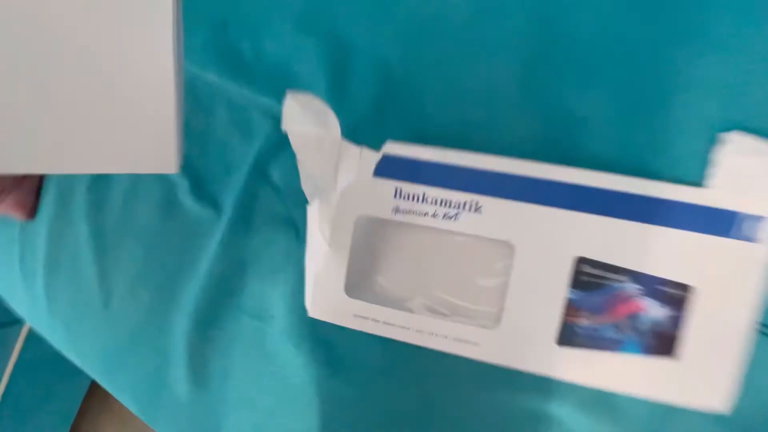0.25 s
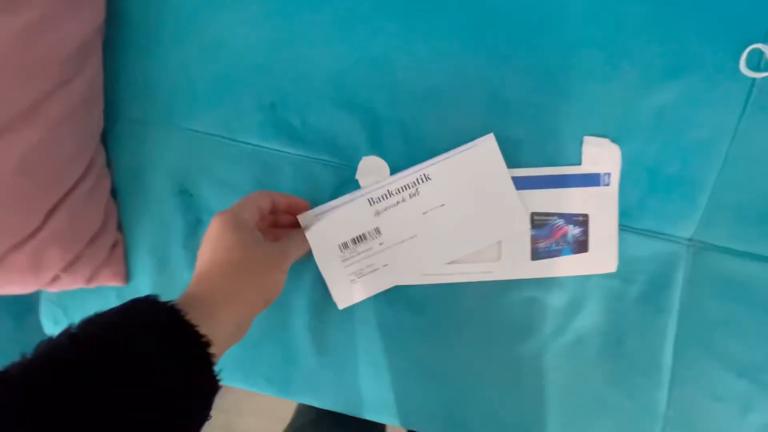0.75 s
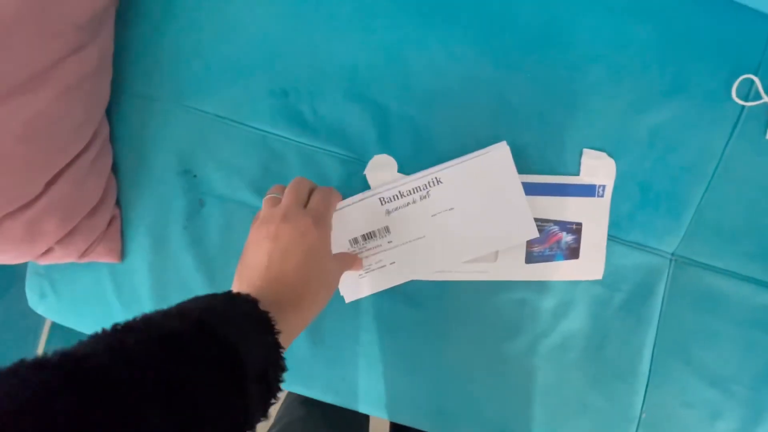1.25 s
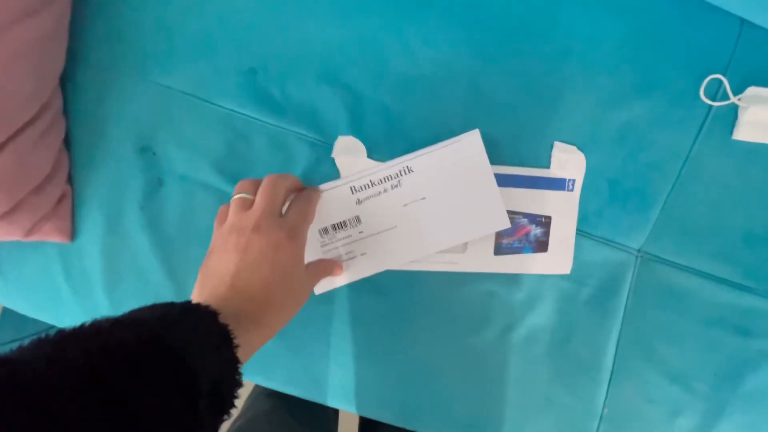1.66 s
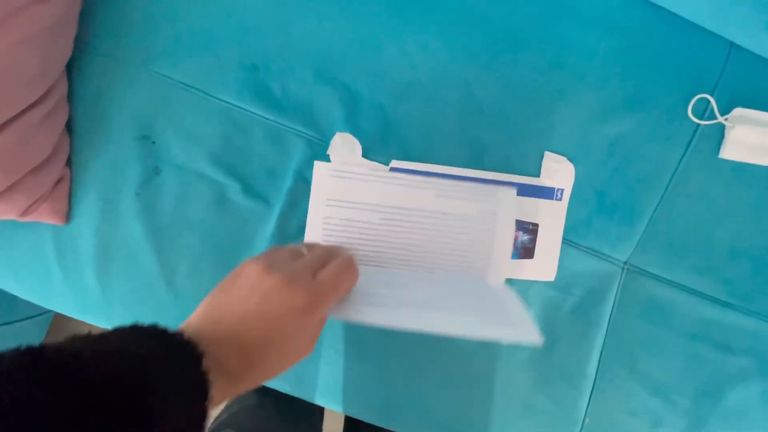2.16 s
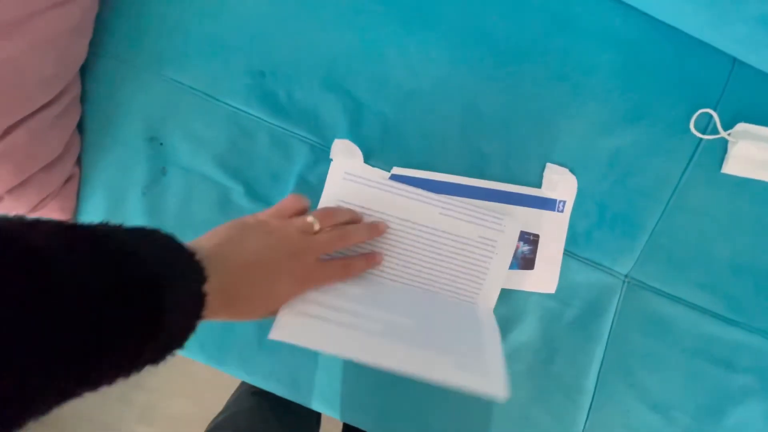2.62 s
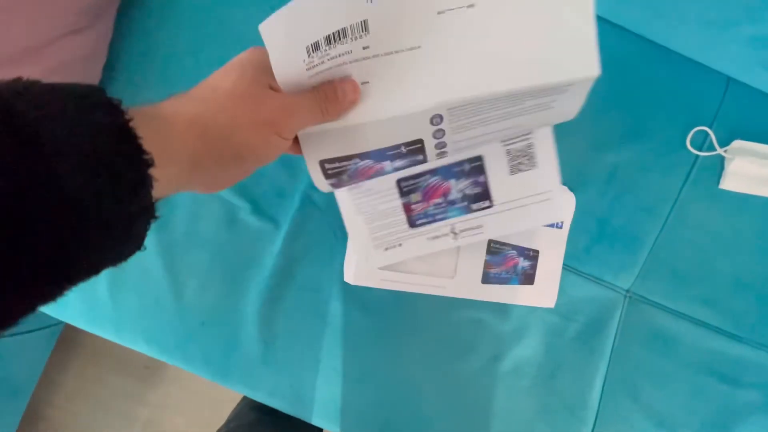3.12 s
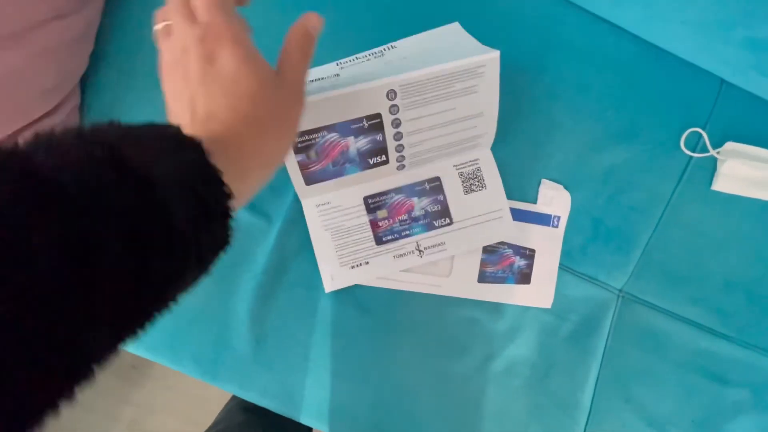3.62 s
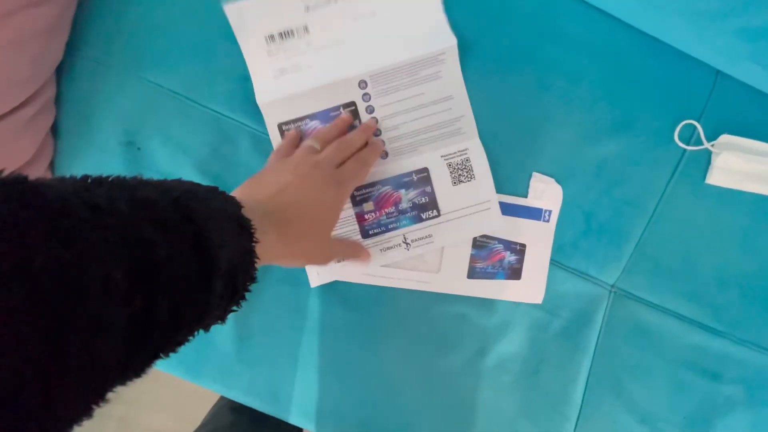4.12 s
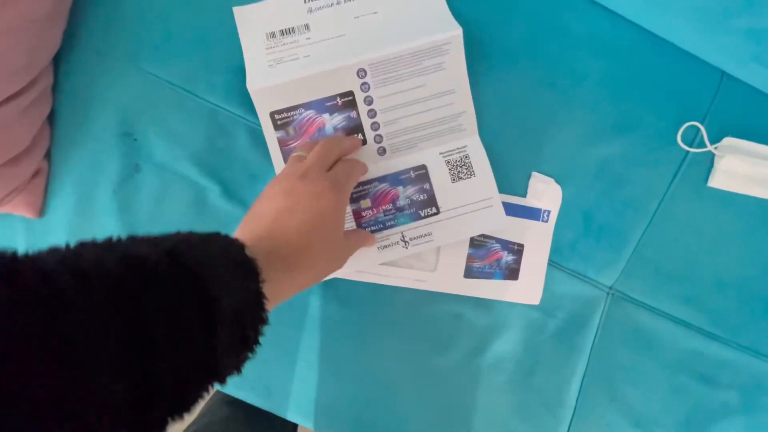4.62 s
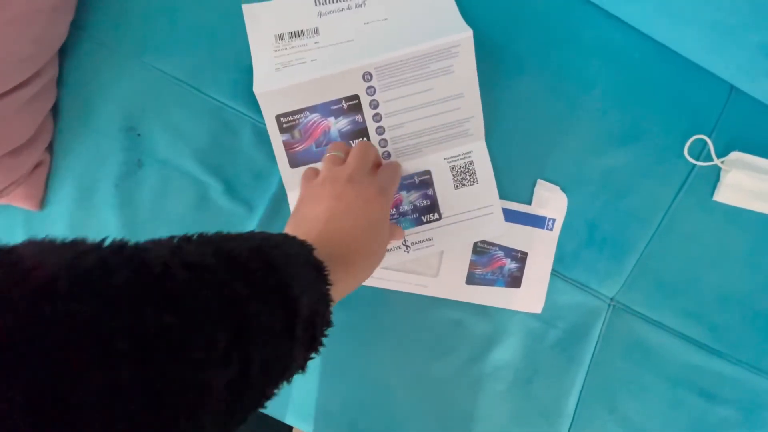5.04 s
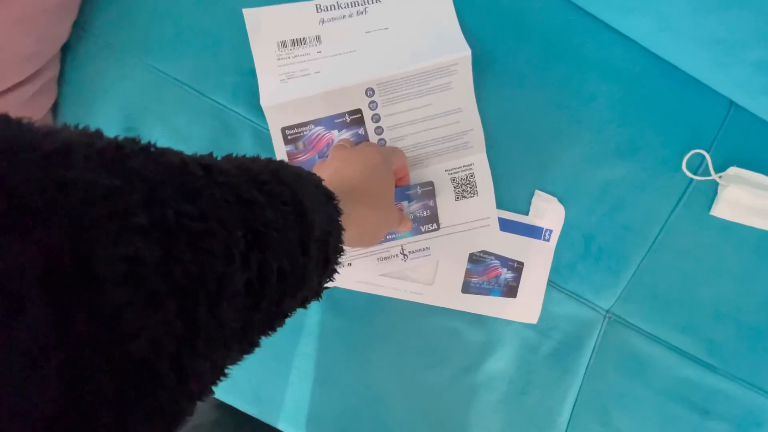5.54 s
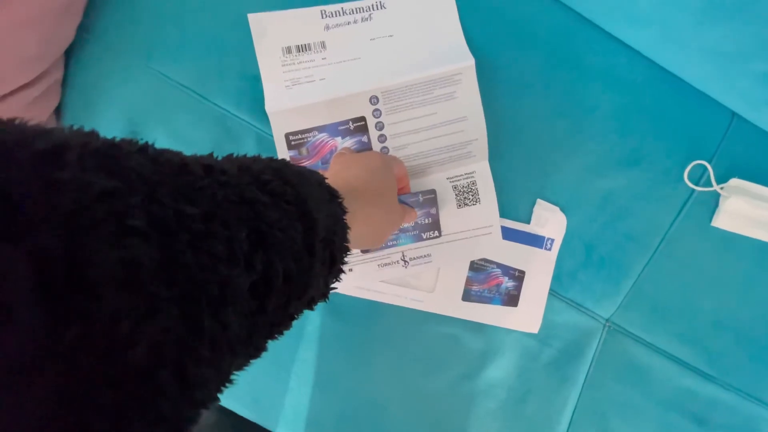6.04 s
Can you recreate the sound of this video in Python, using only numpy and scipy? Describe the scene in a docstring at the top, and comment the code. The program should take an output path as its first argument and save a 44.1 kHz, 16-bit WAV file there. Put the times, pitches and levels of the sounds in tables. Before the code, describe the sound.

Very close, a paper sheet brushes and hisses over an envelope on a cushioned sofa. It slides, buckles and unfolds with a loud crease pop, then crackles as it is flattened. Quiet fingertip rubbing follows, before glue lets go in sharp bright snaps. Soft low thuds accompany handling; a small stereo device hears it in a dry furnished room over faint rumble.

```python
"""Unfolding a letter on a sofa

A hand lays a folded letter on its envelope on a sofa, slides it, unfolds it and peels at a glued card.
Rubbing is random fibre grains coloured into hiss, finest fibres and sheet body, swelling stroke by stroke.
Creases, glue, taps and ticks are noise bursts spread by pitch; sheet and cushion thud in low noise.
Two microphone ports a few centimetres apart listen in a soft furnished room, over a faint house rumble."""
import sys
import numpy as np
from scipy import signal
from scipy.fft import rfft, irfft, next_fast_len
from scipy.io import wavfile

SR = 44100
rng = np.random.default_rng(int(sys.argv[2]) if len(sys.argv) > 2 else 0)


def transcribe(u):
    """Save the signal u as a 16-bit wav file named by the first command-line argument.

    u: samples, shape (n,) or (channels, n), limited to [-1, 1]; the rate is SR.
    q: integer samples, one column per channel.
    """
    v = np.clip(np.atleast_2d(u).T, -1, 1)
    q = np.round(v * 32767).astype(np.int16)
    wavfile.write(sys.argv[1], SR, q)


N = 276948

# Spectrum shapes of paper hiss, finest fibres, sheet body, moving air and house rumble; only the shape counts.
# Each row: frequency in Hz, relative density in dB per Hz.
HISS_SPECTRUM = [(1800, -24), (2800, 1.5), (3800, 4.5), (5200, 6.5), (9000, 10.5), (10500, -39.5)]
FINE_SPECTRUM = [(8800, -37), (10900, -11.5), (12000, -34)]
BODY_SPECTRUM = [(200, -15.5), (850, 1), (1500, -3.5), (2400, 2.5), (3300, -13)]
THUD_SPECTRUM = [(30, -14), (60, 5), (120, 3.5), (280, -1.5), (800, -47)]
RUMBLE_SPECTRUM = [(25, -17), (58, -2.5), (85, -8.5), (500, -39), (11000, -49), (13000, -81)]
RUMBLE_DB = -65   # rms of the part both ports share

# Phase lead of the left port over the right. Each row: frequency in Hz, lead in radians.
LEFT_LEADS = [(500, .1), (1700, -.55), (2500, -1.2), (4400, -1.7), (5300, .35), (7700, 2.5), (9600, 3.2),
              (12200, 5.8)]
# Level of the left port over the right. Each row: frequency in Hz, difference in dB.
LEFT_LOUDER = [(110, 0), (400, 3.5), (1400, 2), (3200, -3), (5000, -.5)]
# Gain of the rubbing that reaches the ports in opposite polarity. Each row: frequency in Hz, gain in dB.
OPPOSED_RUBBING = [(400, 4), (1200, -9.5), (4500, -4), (8000, -20.5)]
ROOM_T60_S, ROOM_DB = .25, -27
CUTOFF_HZ = 16600

# Fingers and sheets slide.
# Each row: start in seconds, length in seconds, hiss level in dB, finest-fibre share in dB.
SLIDES = [(0.0, 0.095, -48.5, -1), (0.151, 0.085, -61, 5.5), (0.25, 0.096, -52.5, -3.5),
          (0.356, 0.22, -59.5, -2), (0.454, 0.075, -51, -5.5), (0.605, 0.079, -60.5, -2),
          (0.689, 0.15, -52.5, -8), (1.111, 0.069, -55, 3), (1.21, 0.14, -63.5, 2.5),
          (1.392, 0.079, -58.5, 4.5), (1.492, 0.26, -64, 8), (1.781, 0.13, -49, 3.5),
          (1.916, 0.29, -53.5, 2), (2.215, 0.13, -54.5, 5.5), (2.347, 0.33, -54.5, 5),
          (2.664, 0.26, -47.5, -0.5), (2.933, 0.28, -53.5, 1.5), (3.23, 0.16, -48, 1),
          (3.397, 0.058, -42.5, -6), (3.81, 0.077, -52, -5), (3.914, 0.028, -52.5, -3),
          (3.942, 0.22, -57, -1.5), (4.146, 0.18, -70.5, -4), (4.358, 0.56, -60, 1.5),
          (4.653, 0.22, -59.5, 1), (4.929, 0.29, -56, -1.5), (5.125, 0.03, -49, -2),
          (5.229, 0.1, -62.5, -3), (5.338, 0.21, -57, -1), (5.528, 0.12, -69, -7), (5.671, 0.19, -73.5, -6),
          (5.859, 0.46, -64.5, -28)]
SLIDE_RISE_S, SLIDE_STOP_S = .008, .05   # rise time, time to fall 60 dB
SLIDE_ARCH_DB = 3   # a slide is fastest in its middle, quieter by this at both ends
AFTER_DB, AFTER_T60_S = -10, .3   # the sheet settles after each slide, without the finest fibres
# How freely the sheet sounds along with a slide. Each row: time in seconds, body share in dB.
FREE_SHEET = [(0, -37), (.4, -15), (.75, -9.5), (2.3, -3), (3.33, -8.5), (3.42, -4), (3.8, 7.5), (4.09, 5),
              (4.64, -10.5), (4.72, 10), (4.8, -9), (5.0, 4.5), (5.85, 1), (6.28, -3.5)]
# The sheet buckles. Each row: start in seconds, hiss level in dB, body share in dB.
CRUMPLES = [(0.0, -26.5, -11.5), (0.672, -38.5, 3), (0.985, -41, -5.5), (1.058, -51, -4),
            (1.702, -46.5, -6), (1.739, -39, -8.5), (2.129, -41.5, -5.5), (2.241, -55, 16),
            (2.786, -39.5, 14), (2.86, -37.5, -5), (3.845, -32.5, -6.5), (3.995, -30.5, -4),
            (4.053, -40.5, 17), (4.959, -39, 3.5), (5.164, -45, 8), (5.395, -61, 16), (5.474, -42.5, 5.5),
            (6.041, -46.5, 0)]
CRUMPLE_RISE_S, CRUMPLE_T60_S, CRUMPLE_FINE_DB = 0.007, .14, -4.5
GRAINS_PER_S, CRINKLES_PER_S = 20000, 6000   # average counts
RUB_TOP_HZ = 12300   # rubbing falls off steeply above this

# Hand and sheet press the cushion or flap. Each row: start in seconds, peak in dB, centre in Hz.
THUMPS = [(0.0, -35, 85.6), (0.198, -41.5, 79), (0.246, -37.5, 59), (0.688, -37.5, 138),
          (1.047, -46.5, 112), (2.255, -44, 70), (2.791, -36, 267), (3.417, -43.5, 148), (3.82, -40.5, 213),
          (3.977, -38, 209), (4.118, -38, 145), (5.037, -40.5, 147), (5.999, -35.5, 140),
          (6.14, -45.5, 142)]
THUMP_RISE_S, THUMP_T60_S = 0.004, 0.42
PUSH = 1.6   # weight of the first push of a thump against the lumpy noise after it

# Creases flip over. Each row: start in seconds, peak in dB, bass share in dB (full two octaves below 2500 Hz),
# treble share in dB per octave above 3000 Hz, length in seconds (60 dB fall at 2500 Hz).
CREASES = [(0.671, -28, -10, 0, 0.021), (0.953, -35, 9.5, 11, 0.0063), (1.664, -33.5, -4, -7, 0.0079),
           (1.75, -35.5, -3, 3.5, 0.0098), (2.234, -38, 4, -13, 0.037), (2.686, -36, 38, 20, 0.0034),
           (2.78, -9.5, -21, -30, 0.01384), (2.968, -38.5, 2, -19, 0.021), (3.8136, -28.5, 4.5, 4, 0.0075),
           (3.979, -40.5, 20, -11, 0.014), (4.05, -20.5, -23, -3.5, 0.015), (4.06, -28, -16, -46, 0.013),
           (4.115, -23.5, -9.5, -36, 0.0093)]
# Glue lets go, a fingertip taps sheet or card, a paper edge catches and slips.
# Each row: start in seconds, peak in dB.
GLUE = [(5.866, -42.5), (5.955, -20), (5.964, -18.5), (5.9871, -19), (5.9933, -17), (5.997, -4),
        (6.01, -22), (6.0324, -14.5), (6.0362, -7)]
TAPS = [(3.521, -47), (4.203, -48.5), (4.299, -61), (5.562, -36.5), (5.885, -43.5), (6.1129, -37.5),
        (6.134, -40)]
TICKS = [(0.109, -46), (1.005, -36.5), (1.12, -37), (1.788, -52), (1.84, -45), (2.537, -35.5), (3.305, -38),
         (3.371, -40), (3.409, -26), (3.432, -30), (5.205, -38), (5.551, -53)]
# The timbre of each: bass share in dB, treble share in dB per octave, length in seconds, as for the creases.
GLUE_SOUND = (-17.5, 8.9, 0.0081)
TAP_SOUND = (19.5, -28, 0.006)
TICK_SOUND = (-20.5, 3.8, 0.0037)
CRACK = .1   # weight of the one sharp break inside a snap
# Resonances of sheet and port cavity. Each row: frequency in Hz, width in Hz, added level in dB.
RINGS = [(2600, 900, -2), (10900, 800, 15)]

# The air gap between sheets sings. Each row: start in seconds, end in seconds, centre in Hz, added level in dB.
POCKETS = [(0.163, 0.45, 2970, 11), (0.155, 0.58, 4760, 5.5), (1.738, 2.07, 5130, 4.5),
           (1.87, 1.927, 2240, 4), (2.1, 2.652, 2500, 1), (3.258, 3.292, 2000, 11),
           (3.387, 3.447, 1930, 13), (4.928, 5.566, 2370, -12), (5.795, 6.3, 4050, 13),
           (5.81, 6.29, 6140, -8.5)]


def amp(db):
    """Turns dB into a linear factor."""
    return 10 ** (np.asarray(db) / 20)


def rms_one(x):
    """Scales a signal to rms 1."""
    return x / np.sqrt(np.mean(x ** 2) + 1e-20)


def at_hz(points, hz):
    """Reads a curve between its points, on a logarithmic frequency axis."""
    return np.interp(np.log(hz), np.log(np.array(points)[:, 0]), np.array(points)[:, 1])


def bins():
    """Length and frequencies of a padded transform."""
    size = next_fast_len(N + SR)
    return size, np.maximum(np.arange(size // 2 + 1) * SR / size, 1)


def bandpass(x, order, low, high):
    """Keeps one band of a signal."""
    return signal.sosfilt(signal.butter(order, [low, high], "band", fs=SR, output="sos"), x)


def colour(x, spectrum):
    """Gives a steady excitation a spectrum; rms 1."""
    size, hz = bins()
    return rms_one(irfft(rfft(x, size) * amp(at_hz(spectrum, hz)), size)[:N])


def drift(rate_hz):
    """Slow chance, spread 1: white noise through two equal low-pass poles."""
    r = np.exp(-2 * np.pi * rate_hz / SR)
    return rms_one(signal.lfilter([1], [1, -2 * r, r * r], rng.standard_normal(N + SR))[SR:])


def grains(per_s, spread_db):
    """Fibres catch and slip at random moments with uneven strength."""
    sizes = amp(spread_db * np.minimum(rng.exponential(1, N), 4)) * rng.standard_normal(N)
    return sizes * (rng.random(N) < per_s / SR)


def strokes():
    """Levels in dB of hiss, finest fibres and body: slides rise, arch and stop; crumples burst and fade."""
    t = np.arange(0, N + 64, 64) / SR
    start, length, hiss_db, fine_db = np.transpose(SLIDES)[:, :, None]
    over = np.clip(t - start - length, 0, None)
    along = np.clip(2 * (t - start) / length - 1, -1, 1)   # -1 at the start, 1 at the end
    rise = np.clip((t - start) / SLIDE_RISE_S, 0, 1) * amp(hiss_db - SLIDE_ARCH_DB * along ** 2)
    touch = rise * amp(-60 * over / SLIDE_STOP_S)
    after = rise * amp(AFTER_DB - 60 * over / AFTER_T60_S)

    start, hiss_db, body_db = np.transpose(CRUMPLES)[:, :, None]
    since = np.clip(t - start, 0, None)
    buckle = amp(hiss_db) * (1 - np.exp(-since / CRUMPLE_RISE_S)) * amp(-60 * since / CRUMPLE_T60_S)

    slide = np.sum(touch ** 2 + after ** 2, axis=0)
    hiss = slide + np.sum(buckle ** 2, axis=0)
    fine = np.sum((touch * amp(fine_db)) ** 2, axis=0)
    fine = fine + np.sum((buckle * amp(CRUMPLE_FINE_DB)) ** 2, axis=0)
    body = slide * amp(2 * np.interp(t, *np.transpose(FREE_SHEET)))   # doubled dB, as these are powers
    body = body + np.sum((buckle * amp(body_db)) ** 2, axis=0)
    return [np.interp(np.arange(N) / SR, t, 10 * np.log10(p + 1e-12)) for p in (hiss, fine, body)]


def patchy(x, edges_hz):
    """The touching patch moves over the sheet, so each band swells on its own."""
    for low, high in zip(edges_hz, edges_hz[1:]):
        swell = amp(3.5 * drift(12))
        x = x + bandpass(x, 1, low, high) * (swell - 1)
    return rms_one(x)


def rubbing(pressure):
    """One uneven pressure shakes the fibres, which hiss, and the sheet, which crinkles in coarser grains."""
    hiss_db, fine_db, body_db = strokes()
    slips = grains(GRAINS_PER_S, spread_db=1.6)
    crinkles = grains(CRINKLES_PER_S, spread_db=2.5)
    hiss = patchy(colour(slips, HISS_SPECTRUM), 2200 * 1.2 ** np.arange(8))
    fine = patchy(colour(slips, FINE_SPECTRUM), 9500 * 1.07 ** np.arange(5))
    body = patchy(colour(crinkles, BODY_SPECTRUM), 300 * 1.4 ** np.arange(8))
    hiss = hiss * amp(hiss_db + pressure)
    fine = fine * amp(fine_db + pressure)
    body = body * amp(body_db + 1.5 * pressure)
    top = signal.butter(16, RUB_TOP_HZ, fs=SR, output="sos")
    return signal.sosfilt(top, pockets(hiss + body) + fine)


def thuds():
    """Lumpy low noise: the moving sheet pushes air, and each press sounds a band of its own and dies away."""
    smooth = np.exp(-1 / (0.013 * SR))   # the air follows the sheet body within 13 ms
    push_level = signal.lfilter([1 - smooth], [1, -smooth], amp(strokes()[2] - 5.5))
    out = np.zeros(N + SR)
    out[:N] = colour(rng.standard_normal(N), THUD_SPECTRUM) * push_level

    t = np.arange(SR // 3) / SR
    shape = (1 - np.exp(-t / THUMP_RISE_S)) * amp(-60 * t / THUMP_T60_S)
    lead_in = SR // 2 - len(t)   # lets the filter settle before the thump
    starts = np.arange(SR // 2) == lead_in
    whites = rng.standard_normal((len(THUMPS), SR // 2))
    for (start, peak_db, hz), white in zip(THUMPS, whites):
        press = white + PUSH * np.sqrt(SR / hz) * starts
        thump = bandpass(press, 2, hz / 1.6, hz * 1.43)[-len(t):] * shape
        at = int(start * SR)
        out[at:at + len(t)] += amp(peak_db) * thump / np.abs(thump).max()
    return out[:N]


def rumble():
    """The house rumbles faintly: steady noise, strongest in the bass."""
    return amp(RUMBLE_DB) * colour(rng.standard_normal(N), RUMBLE_SPECTRUM)


def ring_along(burst):
    """Sheet and port cavity resonate: each adds a narrow band that rings on."""
    for hz, width, ring_db in RINGS:
        r = np.exp(-np.pi * width / SR)
        poles = [1, -2 * r * np.cos(2 * np.pi * hz / SR), r * r]
        ring = signal.lfilter([(1 - r * r) / 2, 0, (r * r - 1) / 2], poles, burst)
        burst = burst + amp(ring_db) * ring
    # the ports fall off above their ring
    return signal.sosfilt(signal.butter(8, 11500, fs=SR, output="sos"), burst)


def snaps():
    """Bending waves in paper spread by pitch: treble arrives first and dies first, bass comes late and lingers."""
    events = [*CREASES]
    for times, sound in ((GLUE, GLUE_SOUND), (TAPS, TAP_SOUND), (TICKS, TICK_SOUND)):
        events += [(*row, *sound) for row in times]
    start, peak_db, bass_db, treble_db, length = np.transpose(events)[:, :, None]
    t = np.arange(SR // 6) / SR
    white = rng.standard_normal((len(start), len(t)))
    edges_hz = 150 * 2 ** np.arange(0, 6.8, .75)
    burst = 0
    for low, high in zip(edges_hz, edges_hz[1:]):
        hz = np.sqrt(low * high)
        stretched = length * max((2500 / hz) ** .55, .75)   # length in this band
        shape = (1 - np.exp(-t / (0.28 * stretched))) * amp(-60 * t / np.clip(stretched, .002, 1))
        crack = CRACK * np.sqrt(stretched * SR) * (shape == shape.max(axis=1, keepdims=True))
        share_db = bass_db * np.clip(np.log2(2500 / hz) / 2.2, 0, 1)
        share_db = share_db + treble_db * np.clip(np.log2(hz / 3000), 0, 1.5)
        share_db = share_db - 9 * max(np.log2(600 / hz), 0)   # deep bass thins out by 9 dB per octave
        band = bandpass(white * shape + crack, 2, low, high)
        burst = burst + amp(share_db) * band / np.abs(band).max(axis=1, keepdims=True)
    burst = ring_along(burst)
    burst = burst * amp(peak_db) / np.abs(burst).max(axis=1, keepdims=True)
    out = np.zeros(N + len(t))
    for at, one in zip((start[:, 0] * SR).astype(int), burst):
        out[at:at + len(t)] += one
    return out[:N]


def pockets(x):
    """While two sheets part, the gap lifts one band of the rubbing."""
    t, out = np.arange(N) / SR, x
    for start, end, hz, db in POCKETS:
        opening = np.clip(np.minimum(t - start, end - t) / .02 + .5, 0, 1)   # 20 ms fades
        out = out + amp(db) * bandpass(x, 1, hz / 1.08, hz * 1.08) * opening
    return out


def ports(shared, opposed):
    """The two ports hear the paper with their own phase and level, plus a soft furnished room."""
    size, hz = bins()
    t = np.arange(SR // 2) / SR
    # the room answers after 6 ms as fading noise, different at each port
    walls = rng.standard_normal((2, len(t))) * amp(-60 * t / ROOM_T60_S) * (t > .006)
    walls = rfft(walls / np.sqrt(np.sum(walls ** 2) / 2), size)
    # left gets half of each difference, right the opposite half
    half = amp(at_hz(LEFT_LOUDER, hz) / 2) * np.exp(.5j * at_hz(LEFT_LEADS, hz))
    direct = half ** [[1], [-1]]
    heard = rfft(shared, size) * (direct + amp(ROOM_DB) * walls)
    heard = heard + rfft(opposed, size) * amp(at_hz(OPPOSED_RUBBING, hz))
    return irfft(heard, size)[:, :N]


def scene():
    """Paper through the two ports, plus low thuds and rumble."""
    pressure = drift(24.0)   # in dB
    opposite = np.array([[1], [-1]])
    paper = ports(rubbing(pressure) + snaps(), rubbing(pressure) * opposite)
    lows = thuds() + rumble()
    unlike_lows = amp(-12) * (thuds() + rumble()) * opposite   # moving air presses each port differently
    return paper + lows + unlike_lows


def record(dry):
    """The top is cut by a steep low-pass, 70 dB down from the cutoff upward."""
    return signal.sosfilt(signal.cheby2(12, 70, CUTOFF_HZ, fs=SR, output="sos"), dry)


dry = scene()
out = record(dry)
transcribe(out)
```